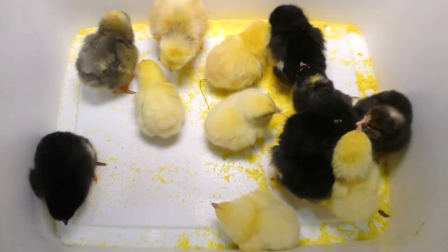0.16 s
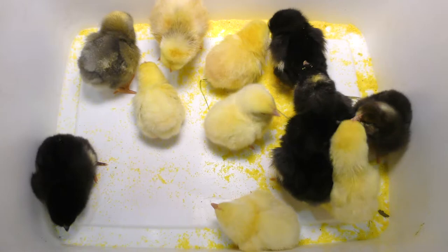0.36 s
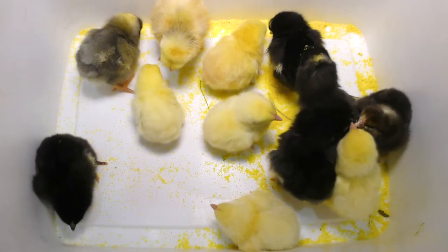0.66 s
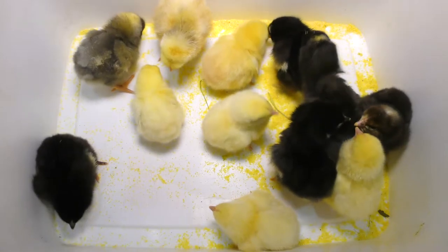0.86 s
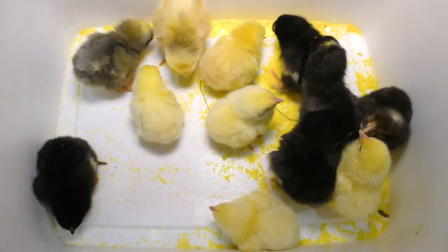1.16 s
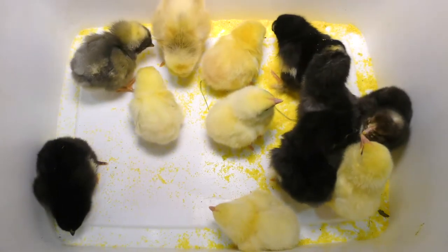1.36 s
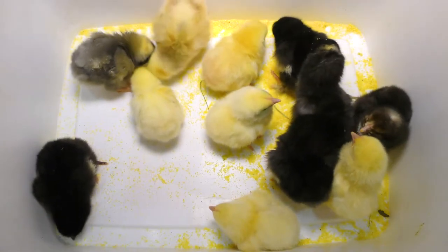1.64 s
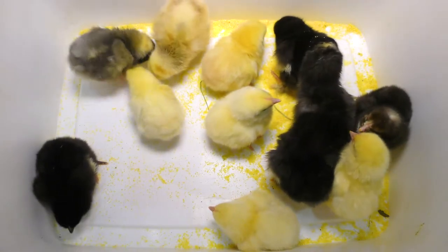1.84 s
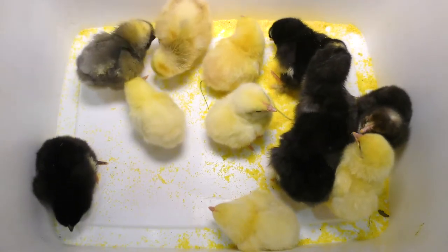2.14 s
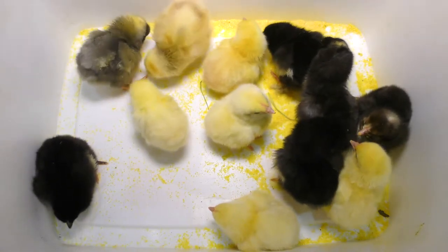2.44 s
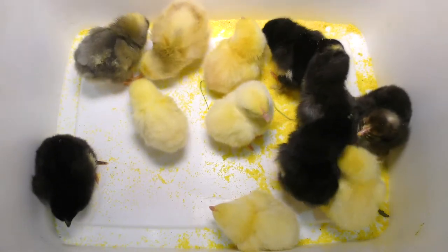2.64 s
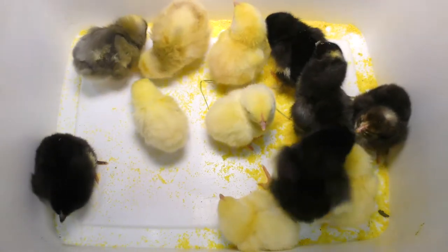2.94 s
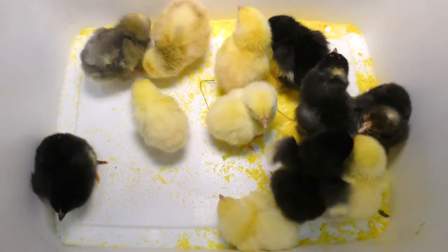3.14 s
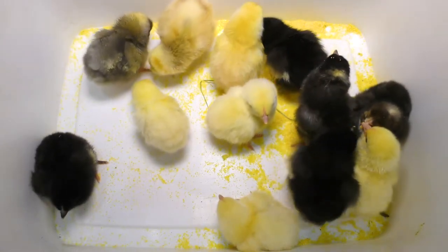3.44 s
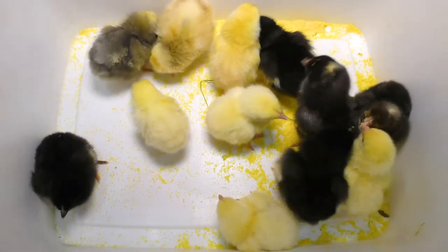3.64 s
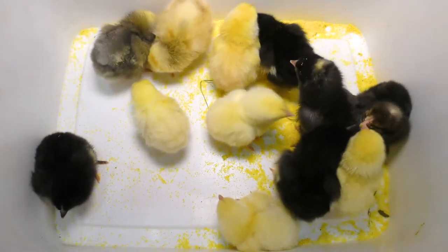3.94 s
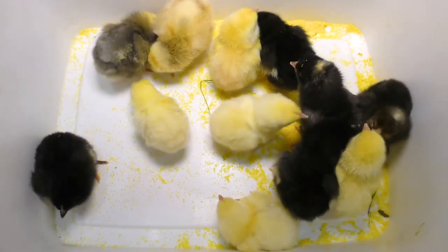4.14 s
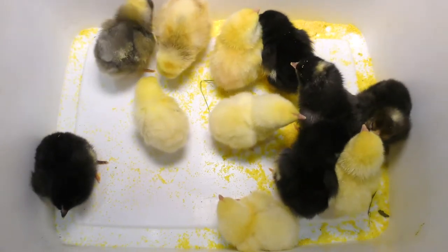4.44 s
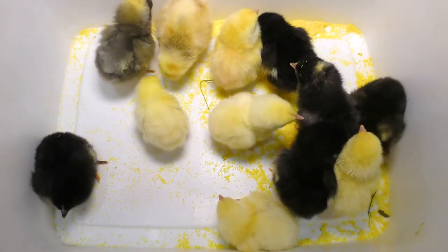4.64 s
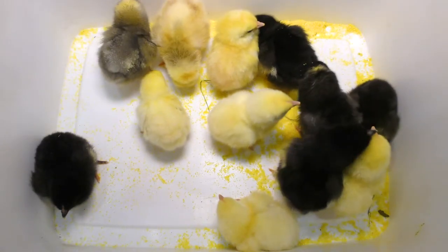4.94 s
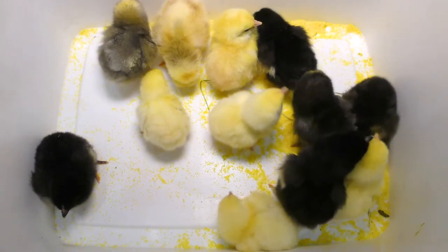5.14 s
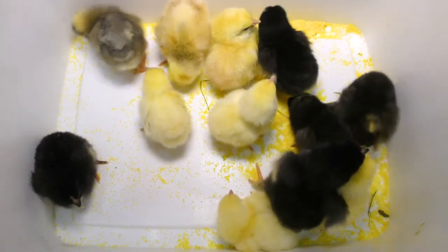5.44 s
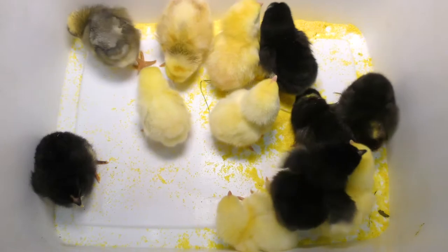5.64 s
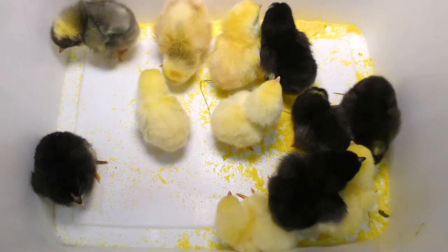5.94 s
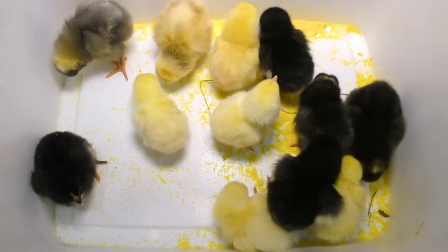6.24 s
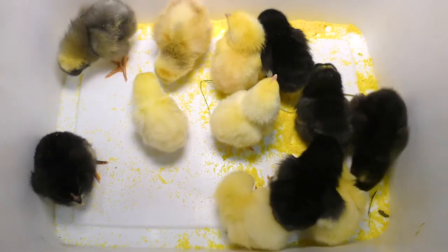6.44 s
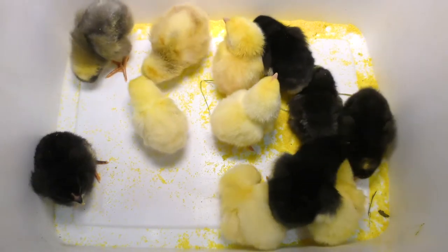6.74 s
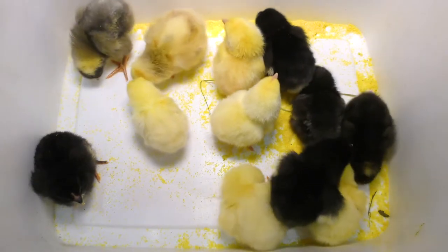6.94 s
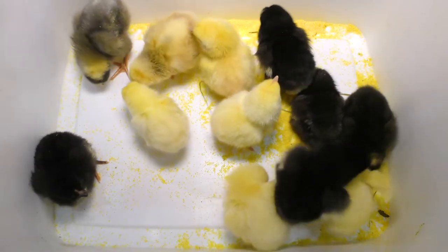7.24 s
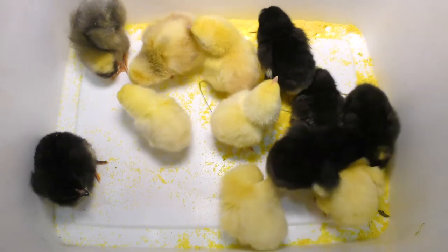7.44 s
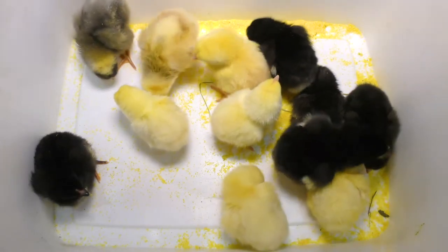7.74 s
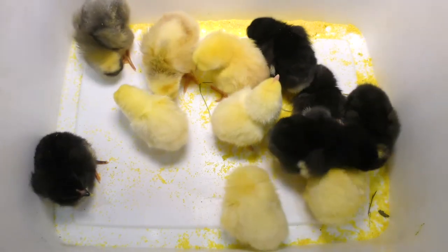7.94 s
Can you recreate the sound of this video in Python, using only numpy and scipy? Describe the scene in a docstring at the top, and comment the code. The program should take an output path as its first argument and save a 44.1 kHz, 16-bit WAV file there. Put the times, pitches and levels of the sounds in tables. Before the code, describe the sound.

About a dozen chicks shift about in a plastic tray and box, heard closely from just overhead indoors. Hard little knocks, single or in quick clusters, dominate, dry and hollow with a short room echo. Between them come very brief, high upward-flicking peeps, a pair of falling ones, then faint rounded ones. Claws and down rustle lightly, longest near the end, over a faint room hush.

```python
"""Chicks in a thin plastic box in a small room, heard from just above: a peck knocks at once.
Half a second in, feet scuffle and the chicks peep: short whistles that hold a low note, then leap up.
Around three seconds two peeps slide down in complaint; after five, soft arched ones mostly take over.
Pecks and steps, noisy blows that make the plastic ring, go on throughout, over a faint room noise.
From seven seconds the longest scuffle, made of bursts of noise, runs under the last rising peeps."""
import sys
import numpy as np
from scipy import signal
from scipy.fft import rfft, irfft, next_fast_len
from scipy.io import wavfile
from scipy.ndimage import uniform_filter1d

SR = 44100
rng = np.random.default_rng(int(sys.argv[2]) if len(sys.argv) > 2 else 0)


def transcribe(signal):
    """Save signal, clipped to [-1, 1], as a 16-bit WAV file at the path in sys.argv[1]."""
    frames = np.atleast_2d(signal).T
    limited = np.clip(frames, -1, 1)
    pcm = np.round(limited * 32767).astype(np.int16)
    wavfile.write(sys.argv[1], SR, pcm)


N = 356328

# peeps that hold a low note, then leap into an arch; effort and throat shape these levels further:
# (start [s], hold [s], length [s], first pitch [Hz], low pitch [Hz], top pitch [Hz], level [dB],
#  second harmonic halfway up the leap, against the note [dB])
RISING_PEEPS = [(0.541, 0.037, 0.07, 2393, 2389, 3960, -21, -21),
                (0.916, 0.012, 0.039, 2380, 2334, 3810, -31.5, -28),
                (1.163, 0.037, 0.066, 2846, 3105, 3600, -29.5, -42),
                (1.488, 0.035, 0.068, 2160, 2236, 3926, -27, -19.5),
                (1.832, 0.033, 0.08, 2964, 2597, 3833, -25.5, -20.5),
                (1.942, 0.018, 0.042, 2180, 2254, 4380, -34.5, -23),
                (2.534, 0.02, 0.047, 2180, 2365, 4560, -34.5, -20),
                (3.419, 0.033, 0.0704, 2125, 2193, 3806, -24, -15.5),
                (4.141, 0.024, 0.044, 2080, 2490, 4270, -32, -47),
                (4.29, 0.031, 0.066, 2114, 2168, 3934, -21.5, -23),
                (4.809, 0.023, 0.045, 2055, 2504, 4900, -33, -14),
                (5.915, 0.011, 0.037, 2400, 2466, 3900, -39.5, -40),
                (7.188, 0.041, 0.078, 2614, 2347, 3844, -23.5, -20.5),
                (7.484, 0.034, 0.05, 2954, 3136, 3900, -23.5, -17.5),
                (8.012, 0.032, 0.11, 2480, 2350, 3940, -24.5, -18)]
# soft, high arched peeps:
# (start [s], length [s], top pitch [Hz], loudest level, reached on the way down [dB])
ARCHED_PEEPS = [(0.552, 0.059, 4750, -34.5), (5.222, 0.042, 4070, -33.5), (5.341, 0.05, 4560, -32),
                (6.116, 0.057, 4170, -36.5), (6.228, 0.074, 4580, -36.5), (6.402, 0.083, 4500, -37.5),
                (6.812, 0.08, 4790, -38.5), (7.046, 0.069, 5010, -39), (7.1, 0.037, 4080, -37),
                (7.329, 0.079, 5150, -40)]
# falling, complaining peeps:
# (start [s], length [s], loudest level [dB], second harmonic before the throat, against the note [dB])
FALLING_PEEPS = [(2.925, 0.073, -33.5, -1.5), (3.293, 0.11, -28, -11)]
# pecks and footfalls on the box, before the trims in taps():
# (blow [s], peak of the ring [dB], thud [dB], tick [dB], pitch of the struck spot [Hz])
BLOWS = [(0.002, -11.5, -31, -34, 1500), (0.479, -29.5, -67, -41.5, 1370), (0.526, -36, -33, -70, 1660),
         (0.637, -20.5, -31, -32.5, 1470), (0.899, -12.5, -42, -41.5, 1500), (0.969, -11, -50, -43.5, 1433),
         (0.995, -20, -41.5, -41, 1310), (1.137, -17, -34, -47.5, 1350), (1.194, -9.5, -30, -41.5, 1593),
         (1.208, -36, -48, -45, 1530), (1.538, -17.5, -51.5, -40.5, 1450), (1.634, -40, -56, -42.5, 1650),
         (1.712, -31, -73, -48, 1400), (1.721, -18.5, -37.5, -52.5, 1490), (2.034, -9, -34.5, -46, 1480),
         (2.377, -19, -38.5, -43.5, 1246), (2.604, -18.5, -47, -38, 1420), (2.613, -16, -38.5, -40, 1560),
         (2.748, -30.5, -47.5, -51, 1420), (2.987, -24.5, -44.5, -75, 1630), (3.136, -37.5, -43, -58, 1410),
         (3.184, -17, -33, -40, 1435), (3.737, -33, -52, -52.5, 1420), (3.796, -15, -34.5, -32.5, 1350),
         (3.845, -19, -50, -35.5, 1450), (3.882, -22, -38, -53, 1610), (4.123, -16.5, -34.5, -42.5, 1435),
         (4.408, -36, -65, -56, 1520), (4.948, -14, -38.5, -35.5, 1313), (5.256, -31, -64, -67, 1420),
         (5.301, -25, -47.5, -73, 1456), (5.423, -26.5, -30, -58, 1400), (5.568, -22, -35, -55, 1460),
         (6.062, -14, -47, -43.5, 1530), (6.137, -27.5, -51.5, -56, 1450), (6.2, -23.5, -43, -49.5, 1480),
         (6.51, -26, -49.5, -49.5, 1540), (6.564, -23.5, -38.5, -57, 1430), (6.603, -23, -36.5, -67, 1460),
         (6.806, -31, -54, -49, 1340), (6.822, -14.5, -27.5, -42, 1574), (7.006, -31, -52, -54, 1280),
         (7.048, -30.5, -48, -55, 1520), (7.158, -14.5, -26, -38.5, 1610), (7.208, -15, -29.5, -40.5, 1530),
         (7.349, -28.5, -39, -55, 1660), (7.554, -33, -41.5, -50, 1480), (7.639, -37.5, -41.5, -66, 1420),
         (7.666, -15.5, -28, -38.5, 1560), (7.841, -26, -42, -51.5, 1580), (7.969, -28, -45.5, -53, 1320),
         (8.034, -28.5, -43, -45, 1660)]
# the whole floor flexing, with no foot resting on it: (pitch [Hz], strength [dB], time to fall 60 dB [s])
THUD_MODES = [(211, -8, 0.055), (368.5, 0.5, 0.064), (435.3, 2.5, 0.063), (661, -13, 0.13)]
# small bending waves that tick, at an average spot: (pitch [Hz], strength [dB], time to fall 60 dB [s])
TICK_MODES = [(2490, 2.64, 0.016), (3600, 8.4, 0.0024), (6150, 7.4, 0.0014)]
# thin plastic around an average struck spot, with no foot resting on it:
# (pitch [Hz], strength [dB], time to fall 60 dB [s])
RING_MODES = [(920, -11, 0.013), (1130, 1.5, 0.0022), (1368, 4, 0.0084), (1834, -5, 0.0027)]
# bouts of shuffling claws and down, before the split into layers: (start [s], length [s], level [dB])
SCUFFLE_BOUTS = [(0.486, 0.068, -46), (2.865, 0.36, -51), (5.131, 0.11, -46.5), (5.418, 0.04, -36.5),
                 (5.842, 0.044, -49.5), (6.53, 0.038, -40), (6.984, 1.3, -52.5)]
# colour of scratching claws; only the shape counts: (frequency [Hz], level [dB per Hz])
SCRATCH_COLOUR = [(1500, -3.5), (6700, -3), (8500, -8.5), (13000, -29)]
# colour of the quiet room; only the shape counts: (frequency [Hz], level [dB per Hz])
ROOM_COLOUR = [(20, 10.5), (70, -13.5), (115, -3), (1000, -11), (8000, -22.5), (16000, -28.5)]
# echo of the room: (frequency [Hz], time to fall 60 dB [s], strength [dB])
ROOM_ECHO = [(150, 0.22, -7.5), (420, 0.43, -13), (760, 0.45, -3.5), (1130, 0.55, -20.5), (2800, 0.45, -8),
             (5960, 0.39, -9)]
# how alike left and right are in sound from all around: (frequency [Hz], likeness [0-1])
LIKENESS = [(40, 0.1), (100, 1), (1200, 0.88), (3000, 0.59), (8000, 0.07)]

CUTOFF_HZ = 15900
# rising peeps: the leap takes LEAP_S in a call of LOUD_DB, and longer in softer ones
LEAP_S, LEAP_LEAD_S, SETTLE_S, LOUD_DB, SLOWER_S_PER_DB = .024, .004, .011, -21, .0006
# when the voice breaks, this share of the leap is covered at once
JUMP_SHARE, JUMP_S = 0.227, 0.00094
# a call that lasts beyond the crest sinks this far in this time
SINK_HZ, SINK_S = 700, .018
# effort swells on the low note, dips at the break and recovers for the arch
SWELL_DB, BREAK_DB, ARCH_DB, FADE_DB, RECOVER_S = 10, -7, -1.5, -8, .006
# a soft note that starts off its pitch rasps until it settles: most when this far off
RASP_OFF_HZ = 330
# arched peeps follow a blunt bell: crest as a share of the length, half width, bluntness,
# and share of the top pitch lost far from the crest
CREST_AT, CREST_WIDTH_S, CREST_POWER, ARCH_DEPTH = .41, .027, 2.6, .35
# falling peeps slide to a knee (placed as a share of the length), then drop faster
FALL_FIRST_HZ, FALL_KNEE_HZ, FALL_LAST_HZ, KNEE_AT = 3580, 3003, 2310, .7
# a peep quavers by this many dB for each dB below a clear call
CLEAR_DB, QUAVER_PER_DB = -25.5, 0.2819
SPOT_HZ = 1465  # pitch of an average spot
TOUCH_LEAD_S = 0.00259  # from the first light touch to the blow
# a bending wave spreads through the floor, its low pitches trailing behind the high ones
BEND_FIRST_HZ, BEND_SLOW_S, BEND_FADE_S = 743, 0.0188, 0.021
# a bout of scuffling swells, sags and dies away
BOUT_ATTACK_S, BOUT_SAG_DB, BOUT_RELEASE_S = 0.057, -4, 0.12


def rising_peeps(purer_db=7):
    """The chick holds a low note, its voice breaks into the high register and it arches over."""
    out = np.zeros((2, N))
    for start, hold, length, first, low, top, db, overtone_db in RISING_PEEPS:
        t = np.arange(0, length, 1 / SR)
        settled, leap = max(hold - SETTLE_S, 1 / SR), hold - LEAP_LEAD_S
        leap_s = LEAP_S + SLOWER_S_PER_DB * (LOUD_DB - db)
        climb = np.clip((t - leap) / leap_s, 0, 1)
        sink = np.maximum(t - leap - leap_s, 0) / SINK_S
        jump = np.clip((t - hold) / JUMP_S + .5, 0, 1)
        glide = 1 - (1 - climb) ** 2
        rise = JUMP_SHARE * jump + (1 - JUMP_SHARE) * glide
        held_note = np.interp(t, [0, settled], [first, low])
        pitch = held_note + (top - low) * rise - SINK_HZ * sink ** 2
        effort = np.interp(t, [0, settled, hold, hold + RECOVER_S, length],
                           [-SWELL_DB, 0, BREAK_DB, ARCH_DB, ARCH_DB + FADE_DB])
        softness = np.clip((CLEAR_DB - db) / 10, 0, .5)
        rasp = softness * np.clip(abs(first - low) / RASP_OFF_HZ * (1 - (t / hold) ** 2), 0, 1)
        # the high register is purer than the low one
        overtones = overtone_db + purer_db * (.5 - climb)
        add(out, start, whistle(pitch, db + effort, overtones, rasp))
    return out


def arched_peeps(crest_dip_db=6.5, overtone_db=-26):
    """Soft calls whose pitch rises to a round crest, and which are loudest on the way down."""
    out = np.zeros((2, N))
    for start, length, top, db in ARCHED_PEEPS:
        from_crest = np.arange(0, length, 1 / SR) - CREST_AT * length
        drop = 1 - np.exp(-np.abs(from_crest / CREST_WIDTH_S) ** CREST_POWER)
        swell = np.sin(np.pi * drop) * (from_crest > 0)
        level = db - crest_dip_db * (1 - swell)
        add(out, start, whistle(top * (1 - ARCH_DEPTH * drop), level, overtone_db, wall_db=-7.5))
    return out


def falling_peeps(swell_db=7, loudest_at=0.3):
    """Complaints: the note swells and quavers as it slides down."""
    out = np.zeros((2, N))
    for start, length, db, overtone_db in FALLING_PEEPS:
        along = np.arange(0, length, 1 / SR) / length
        pitch = np.interp(along, [0, KNEE_AT, 1], [FALL_FIRST_HZ, FALL_KNEE_HZ, FALL_LAST_HZ])
        level = db + np.interp(along, [0, loudest_at], [-swell_db, 0])
        add(out, start, whistle(pitch, level, overtone_db, wall_db=-10.0))
    return out


def whistle(pitch, level_db, overtone_db, rasp=0, attack=0.0031, release=0.0086,
            jitter=0.0069, step_db=-10, wall_db=-10):
    """One peep: a near sine with weak overtones and a fluttering pitch, echoed by the box walls."""
    size = len(pitch)
    t = np.arange(size) / SR
    waver = smooth_noise(size, 60)
    phase = 2 * np.pi * np.cumsum(uniform_filter1d(pitch, size=130) * (1 + jitter * waver)) / SR
    tone = np.sin(phase)
    for k in range(2, 6):
        # the tiny throat passes little above 7 kHz
        throat_db = np.interp(k * pitch, [6520, 7860, 12900, 17000], [2, -10.5, -13.5, -30])
        source_db = overtone_db if k == 2 else np.minimum(overtone_db, -10)
        tone = tone + np.sin(k * phase) * from_db(source_db + step_db * (k - 2) + throat_db)
    # the softer the note, the more its loudness quavers
    quaver_db = np.clip(CLEAR_DB - np.max(level_db), 0, 20) * QUAVER_PER_DB
    quaver = from_db(quaver_db * smooth_noise(size, 130))
    # a rasp chops the note irregularly
    chop = smooth_noise(size, 50)
    tone = tone * (np.sqrt(1 - rasp) + np.sqrt(rasp / 2) * chop)
    fade = np.minimum(t / attack, 1) * np.minimum((t[-1] - t) / release, 1)
    tone = tone * quaver * from_db(level_db) * fade
    longer = np.arange(size + SR // 100) / SR  # leaves time for the echoes
    out = np.zeros((2, len(longer))) + np.interp(longer, t, tone, right=0)
    for lag in rng.uniform(0.000783, 0.0046, size=3):
        # each echo reaches left and right at slightly different times
        lags = lag + rng.standard_normal() / SR * np.array([[1], [-1]])
        out += from_db(wall_db) * np.interp(longer - lags, t, tone, left=0, right=0)
    return out


def taps(ring_db=-11.0, tick_db=0.5, count=5):
    """Pecks and footfalls in several places; stiffer spots of the plastic ring higher."""
    places = np.zeros((count, 2, N))
    for k, (s, ring, thud, tick, spot_hz) in enumerate(BLOWS):
        blow = strike(thud, ring + ring_db, tick + tick_db, spot_hz / SPOT_HZ)
        add(places[k % count], s - TOUCH_LEAD_S, blow)
    return sum(in_room(place) for place in places)


def strike(thud_db, ring_db, tick_db, stiffness, skid=0.06, skid_s=0.0031, rattle=0.034,
           rattle_s=0.011, bounce=0.4, touch=0.25, snap=5.1, bend_db=-5.5, crack=5.4):
    """A beak or claw hits, bounces, skids and rattles the floor, driving its thud, ring and tick."""
    t = np.arange(SR // 8) / SR
    roughness = skid * np.exp(-t / skid_s) + rattle * np.exp(-t / rattle_s)
    force = rng.standard_normal((2, len(t))) * roughness
    force[0, 0] += 1
    force[0, int(rng.uniform(.001, .004) * SR)] += bounce * rng.random()
    # a lighter first touch may come just before the blow
    blow = np.pad(force, [(0, 0), (int(TOUCH_LEAD_S * SR), 0)])[:, :len(t)]
    force = touch * rng.random() ** 2 * force + blow
    # the farther the spot, the more the bending wave is drawn out
    sweep = BEND_FIRST_HZ / (1 + t / (BEND_SLOW_S * (.5 + rng.random()))) ** 2
    wave = np.sin(2 * np.pi * np.cumsum(sweep) / SR) * np.exp(-t / BEND_FADE_S)
    bend = signal.fftconvolve(force[0], wave)[:len(t)]
    flex = resonate(force[0], THUD_MODES, scatter_db=1, detune=0.037)
    thud = band_pass(rms_one(flex) + from_db(bend_db) * rms_one(bend), low_hz=116, high_hz=855)
    spot_modes = np.array(RING_MODES) * [stiffness, 1, 1]
    plastic = resonate(force[0], spot_modes, scatter_db=2.5, detune=0.025)
    ring = band_pass(plastic + crack * force[0], low_hz=845, high_hz=2460)
    # the contact itself snaps, and only the finest skidding differs between left and right
    small_waves = resonate(force[0], np.array(TICK_MODES) * [stiffness, 1, 1], scatter_db=3.5)
    centre = small_waves + snap * force[0]
    side = snap * np.diff(force[1], prepend=0)
    tick = band_pass(centre + side * np.array([[1], [-1]]), low_hz=2450, high_hz=7600)
    layers = from_db(thud_db) * rms_one(thud) + from_db(ring_db) * rms_one(ring)
    layers = layers + from_db(tick_db) * rms_one(tick)
    return layers * np.sqrt(SR // 50 / len(t))  # levels are rms over 20 ms


def resonate(force, modes, scatter_db=0, detune=0):
    """Ring a set of modes; the struck spot and the chicks' weight shift each one's strength and pitch."""
    out = 0
    for k, (hz, db, t60) in enumerate(modes):
        r = from_db(-60 / (t60 * SR))
        w = 2 * np.pi * hz * np.exp(detune * rng.standard_normal()) / SR
        gain = (-1) ** k * from_db(db + scatter_db * rng.standard_normal())
        out = out + gain * signal.lfilter([1, 0, -1], [1, -2 * r * np.cos(w), r * r], force)
    return out


def scuffle(flex_db=-12.5, ring_db=-2.5, scratch_db=-7.0, rest_db=-62.5):
    """Feet catch and slip in bouts, never quite stopping: the floor flexes and rings, claws scratch."""
    t = np.arange(N) / SR
    effort = from_db(rest_db)
    for start, length, db in SCUFFLE_BOUTS:
        age = t - start
        swell = np.clip(age / BOUT_ATTACK_S + .5, 0, 1)
        sag_db = BOUT_SAG_DB * np.clip(age / length, 0, 1)
        release = np.exp(-np.clip((age - length) / BOUT_RELEASE_S, 0, 20))
        effort = effort + swell * from_db(db + sag_db) * release
    slips = grains(per_s=90, spread_db=1.5, length_s=0.0034, bed=0.59)
    # the resting foot damps the floor
    flex = rms_one(resonate(slips[0], np.array(THUD_MODES) * [1, 1, .4]))
    ring = rms_one(resonate(slips[0], np.array(RING_MODES) * [1, 1, .5]))
    scratches = grains(per_s=190, spread_db=3.0, length_s=0.0066, bed=0.57)
    scratching = diffuse(scratches, SCRATCH_COLOUR)
    return effort * (from_db(flex_db) * flex + from_db(ring_db) * ring + from_db(scratch_db) * scratching)


def grains(per_s, spread_db, length_s, bed):
    """Noise in brief random bursts of uneven size, over a steady bed."""
    starts = rng.random(N) < per_s / SR
    sizes = starts * from_db(spread_db * np.minimum(rng.exponential(1, N), 3))
    bursts = signal.lfilter([1], [1, -np.exp(-1 / (length_s * SR))], sizes + 1e-18)
    return rng.standard_normal((2, N)) * (rms_one(bursts) + bed)


def in_room(sound):
    """A sound and the room's answer, which differs from one place in the box to the next."""
    return sound + signal.fftconvolve(sound.mean(axis=0)[None], room(), axes=-1)[:, :N]


def room(build_s=0.00031):
    """An echo from all around that builds up quickly and dies at its own rate in each half octave."""
    t = np.arange(SR * 4 // 5) / SR
    tail = 0
    for hz in np.geomspace(100, 12800, 15):
        edges = hz * np.sqrt(2) ** np.array([-.5, .5])
        band = signal.butter(2, edges, "band", fs=SR, output="sos")
        decay = from_db(-60 * t / at_hz(ROOM_ECHO, hz)) * (1 - np.exp(-t / build_s))
        noise = diffuse(rng.standard_normal((2, len(t))), [(1, 0)])
        strength = from_db(at_hz(ROOM_ECHO, hz, axis=2))
        tail = tail + signal.sosfilt(band, noise) * decay / np.linalg.norm(decay) * strength
    return tail


def room_tone(level_db=-57.0):
    """The quiet background of the room: steady coloured noise from all around."""
    return from_db(level_db) * diffuse(rng.standard_normal((2, N)), ROOM_COLOUR)


def diffuse(pair, spectrum):
    """Colour two unrelated signals and blend them into left and right, as alike as LIKENESS says."""
    size = pair.shape[-1]
    padded = next_fast_len(size)
    hz = np.arange(padded // 2 + 1) * SR / padded
    alike = np.clip(at_hz(LIKENESS, hz), 0, .999)
    mid, side = rfft(pair, padded) * from_db(at_hz(spectrum, hz))
    left_right = np.sqrt(1 + alike) * mid + np.sqrt(1 - alike) * side * [[1], [-1]]
    return rms_one(irfft(left_right, padded)[:, :size])


def smooth_noise(size, width):
    """Noise smoothed over a number of samples, scaled to an rms of 1."""
    return rms_one(uniform_filter1d(rng.standard_normal(size), size=width))


def band_pass(x, low_hz, high_hz):
    """Keep one band."""
    return signal.sosfilt(signal.butter(2, [low_hz, high_hz], "band", fs=SR, output="sos"), x)


def from_db(db):
    """Decibels to gain."""
    return 10 ** (np.asarray(db) / 20)


def rms_one(x):
    """Scale to an rms (average strength) of 1."""
    return x / np.sqrt(np.mean(x ** 2) + 1e-20)


def at_hz(points, hz, axis=1):
    """Read a table column between its points, on a log-frequency axis."""
    rows = np.array(points)
    return np.interp(np.log(np.maximum(hz, 1)), np.log(rows[:, 0]), rows[:, axis])


def add(out, s, sound):
    """Mix a sound in at a given time in seconds."""
    at = max(round(s * SR), 0)
    part = sound[..., :max(N - at, 0)]
    out[..., at:at + part.shape[-1]] += part


def scene(left_db=0.19):
    """Peeps and taps with the room's answer, a touch to the left, over scuffling and room tone."""
    peeps = in_room(rising_peeps()) + in_room(falling_peeps() + arched_peeps())
    box = peeps + taps()
    return box * from_db([[left_db], [-left_db]]) + scuffle() + room_tone()


def record(dry):
    """Cut the top steeply."""
    return signal.sosfilt(signal.ellip(10, .1, 80, CUTOFF_HZ, fs=SR, output="sos"), dry)


dry = scene()
out = record(dry)
transcribe(out)
```